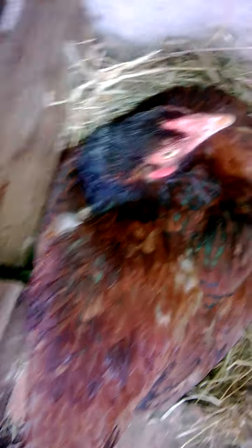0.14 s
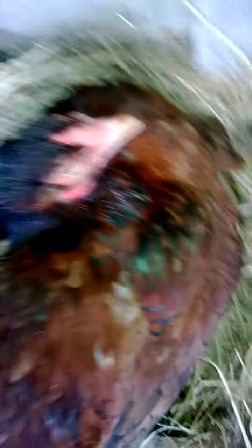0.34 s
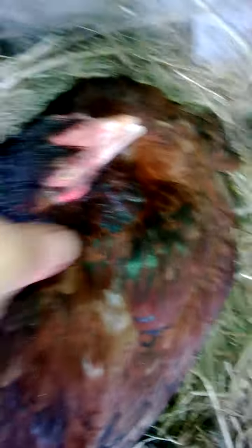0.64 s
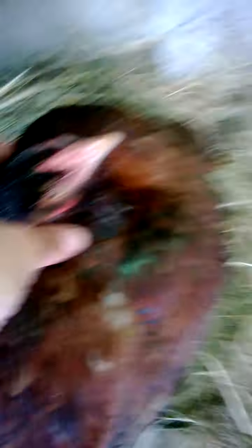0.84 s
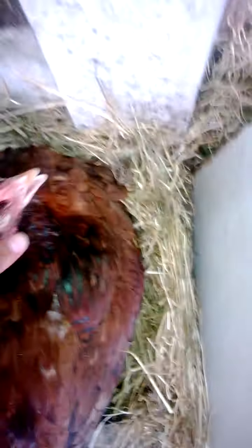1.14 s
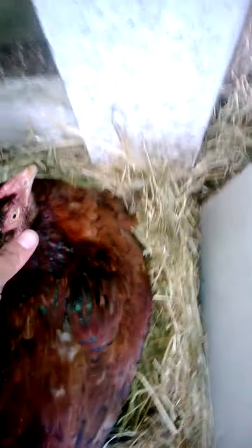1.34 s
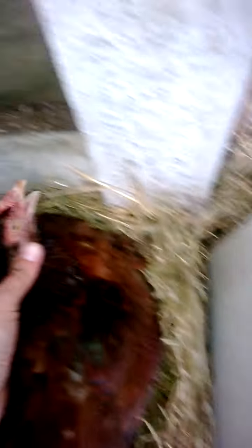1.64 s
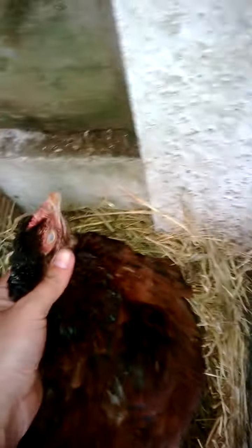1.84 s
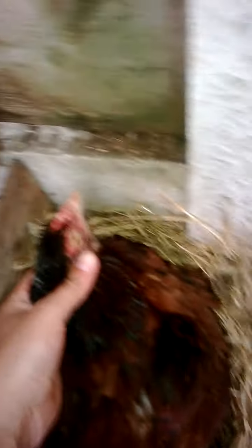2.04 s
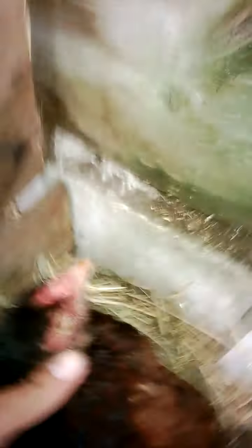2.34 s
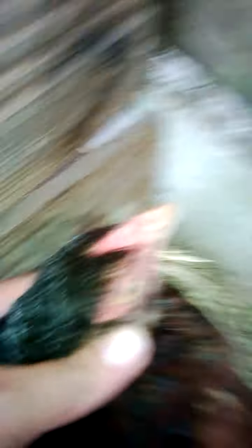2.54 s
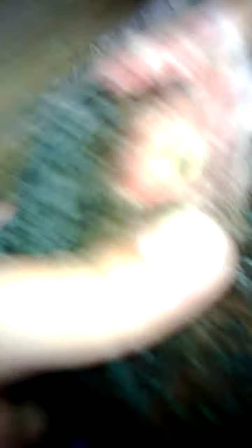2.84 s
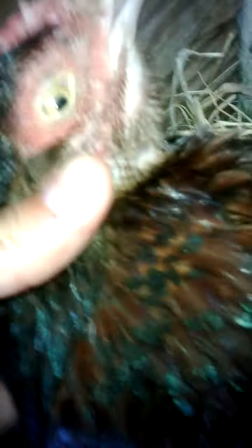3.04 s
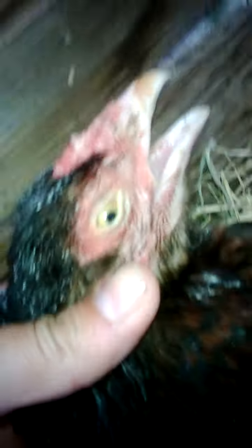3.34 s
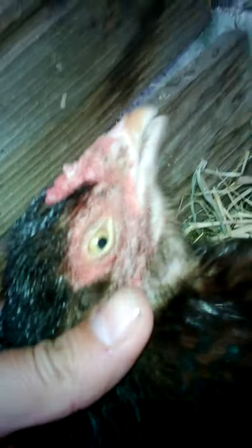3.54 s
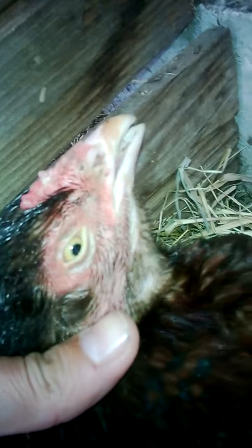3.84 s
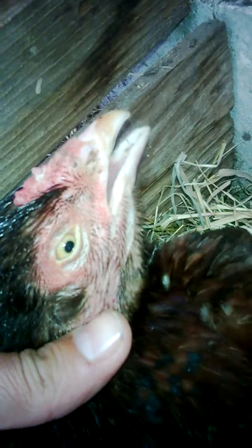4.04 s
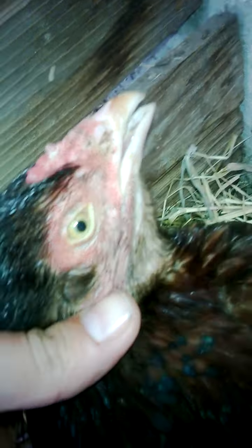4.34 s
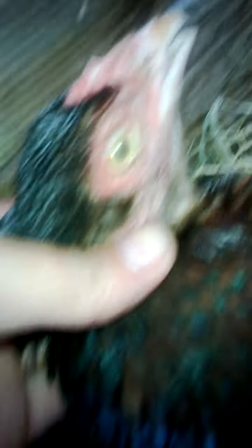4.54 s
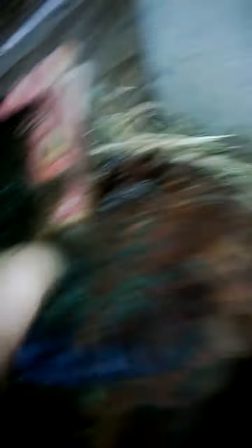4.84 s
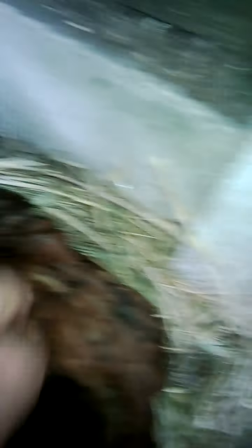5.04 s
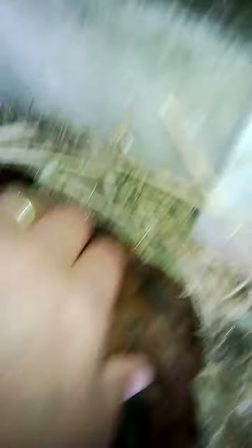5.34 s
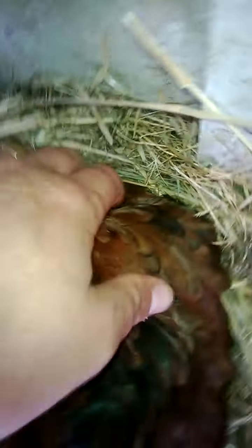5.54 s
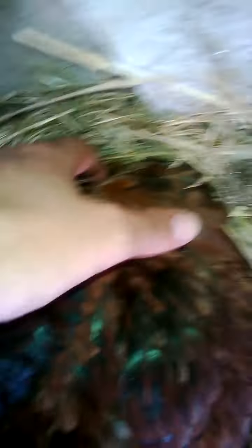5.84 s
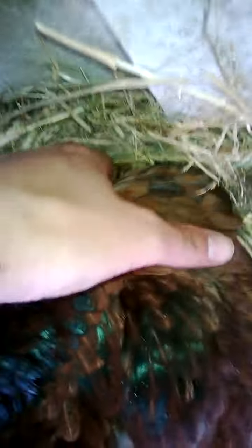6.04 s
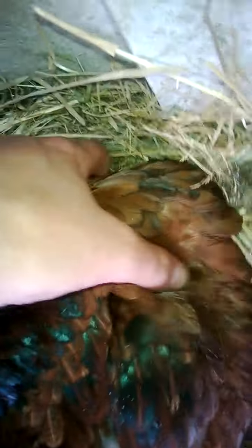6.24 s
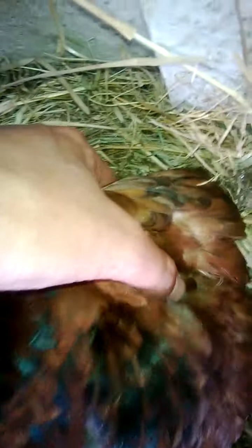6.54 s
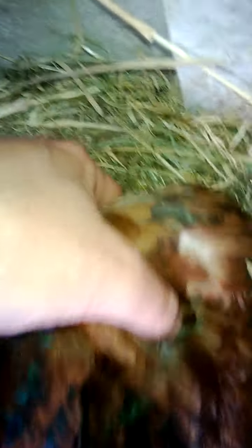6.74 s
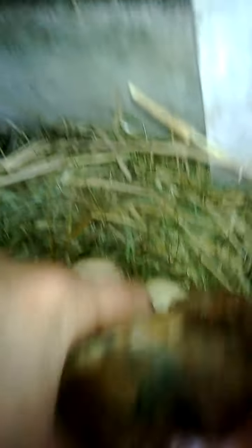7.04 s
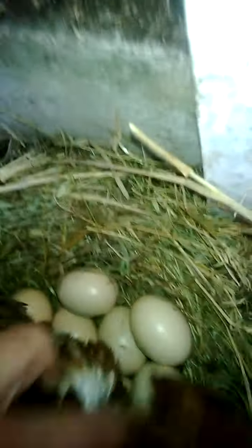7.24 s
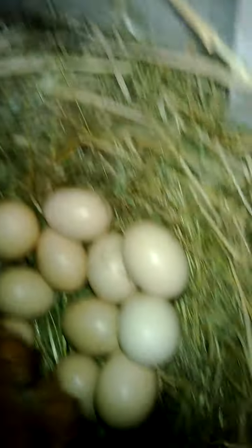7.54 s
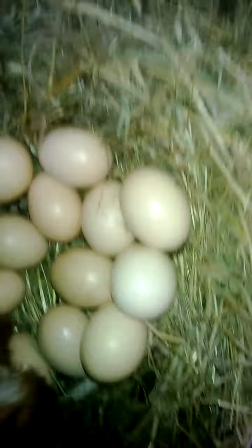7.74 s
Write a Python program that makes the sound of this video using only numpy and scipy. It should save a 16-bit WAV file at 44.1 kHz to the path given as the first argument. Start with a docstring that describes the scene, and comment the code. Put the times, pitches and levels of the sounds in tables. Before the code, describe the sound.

Close, dry mono sound inside a small straw-lined nest box, with faint steady yard hiss and a low engine throb outside that revs and sags. From 0.3 to 2 seconds a hen gives faint peeps and short squawks at about 0.65, 1.2 and 1.7, with soft clucks, as a hand lightly rustles feathers. Around 2.1 to 2.6 the rubbing grows firmer, ending in a scrape. At 2.85 and 3.45 come rough squawks, the latter a quick stutter; hoarse grumbles and tiny nasal whines follow until 4.8, while the engine swells near 3.2 and dips near 4.2. From 5.05 to 6.9 clear peeps alternate regularly with low clucks, about three pairs a second, over brushing and scrapes at 5.4 and 6.0. A peep at 7.05, squawk at 7.3, peep and dry ticks around 7.55, then a sharp snap and thin squawk at 7.8 as the engine revs.

```python
"""Sharp squawks, thin peeps and low gruff clucks of a broody hen, stroked and lifted off her eggs in a nest
box. Her calls are syrinx pulses rung through throat, windpipe and beak, whistles and whines, answered by the
box. A hand slides over her feathers, stroke by stroke: shaped noise with crackles, swishes and scrapes; dry
ticks of straw and beak, and a faint whine trails after one grumble. Outside an engine revs, idles and revs
again: low exhaust orders and rumble. The yard is a steady faint hiss."""
import sys
import numpy as np
from scipy import signal
from scipy.fft import rfft, irfft, next_fast_len
from scipy.io import wavfile
from scipy.ndimage import uniform_filter1d, minimum_filter1d, map_coordinates

SR = 44100
rng = np.random.default_rng(int(sys.argv[2]) if len(sys.argv) > 2 else 0)


def dump(signal):
    """Clip the signal to [-1, 1] and save it as 16-bit WAV at the path in sys.argv[1]."""
    limited = np.clip(np.atleast_2d(signal).T, -1, 1)
    pcm = np.round(limited * 32767).astype(np.int16)
    wavfile.write(sys.argv[1], SR, pcm)


N = 347508
TOP_HZ = 15800  # band limit of the voice pulses and of the output

# low throat resonances: (centre [Hz], width [Hz], level [dB])
CHEST = [(240, 400, -5), (618, 178, 3), (1140, 220, -2.5)]
# high windpipe resonances: (centre [Hz], width [Hz], relative level [dB])
WINDPIPE = [(3310, 3800, -7), (6115, 370, -5), (6660, 330, -5.5), (8130, 6700, -20.5)]


def amp(db):
    """Decibels to gain."""
    return 10 ** (np.asarray(db) / 20)


def unit(x):
    """Scale to rms 1."""
    return x / np.sqrt(np.mean(x ** 2) + 1e-20)


def along(points, hz):
    """(Hz, value) points read on a log-frequency axis."""
    f, v = np.transpose(points)
    return np.interp(np.log(hz + 1), np.log(f + 1), v)


def curves(rows):
    """One value per sample for each column after the time."""
    s, *cols = np.transpose(rows)
    return [np.interp(np.arange(N) / SR, s, c) for c in cols]


def wobble(rate, size=N):
    """A smooth random curve, rate knots a second."""
    return map_coordinates(rng.standard_normal(4096), [np.arange(size) * rate / SR], mode="wrap")


def filtered(x, response):
    """x through a complex response of frequency."""
    m = next_fast_len(len(x) + 4096)
    return irfft(rfft(x, m) * response(np.fft.rfftfreq(m, 1 / SR)), m)[:len(x)]


def resonances(modes, f):
    """Causal response of (Hz, width Hz, dB) resonances of alternating sign."""
    return sum((-1) ** k * amp(db) * 1j * f * w / (c * c - f * f + 1j * f * w)
               for k, (c, w, db) in enumerate(modes))


def chest_response(f):
    """Throat resonances with a steep rolloff above 1450 Hz."""
    return resonances(CHEST, f) / (1 + (f / 1450) ** 8)


def hiss(spectrum):
    """Coloured noise of rms 1 with faint time-frequency patches of random gain."""
    z = signal.stft(rng.standard_normal(N), nperseg=512)[2]
    field = uniform_filter1d(rng.standard_normal(z.shape), size=10, axis=0)
    field = uniform_filter1d(field, size=16, axis=1)
    noise = signal.istft(z * amp(2.5 * unit(field)), nperseg=512)[1][:N]
    return unit(filtered(noise, lambda hz: amp(along(spectrum, hz))))


def narrow_hiss(centre_hz, width_hz):
    """A narrow band of noise around a moving centre."""
    phase = 2 * np.pi * np.cumsum(centre_hz) / SR
    return wobble(width_hz, len(phase)) * np.cos(phase) + wobble(width_hz, len(phase)) * np.sin(phase)


def add(track, s, sound):
    """Mix a sound into the track at time s."""
    room_left = track[round(s * SR):][:len(sound)]
    room_left += sound[:len(room_left)]


def scatter(x, share=0.8, t60=0.016):
    """Hand and boards close by smear each pulse; the echo pattern is redrawn for each sound."""
    t = np.arange(512) / SR
    echoes = rng.standard_normal(len(t)) * amp(-60 * t / t60)
    return x + share * signal.fftconvolve(x, echoes / np.linalg.norm(echoes))[:len(x)]


def yard():
    """The quiet yard: steady coloured noise."""
    # (frequency [Hz], relative density [dB])
    yard_spectrum = [(160, 5.5), (300, -20.5), (1200, -16.5), (4000, -28.5), (7000, -32), (15000, -57.5)]
    return amp(-52.0) * hiss(yard_spectrum)


def engine(rumble_db=-12, steady_db=-29):
    """Exhaust firings from outside, lowest orders only; uneven when weak, steadier under load."""
    # (time [s], mean firing rate [1/s])
    revs = [(0.15, 34.1), (0.5, 55), (1.17, 51.5), (1.68, 60), (2.92, 58.5), (3.43, 71.0), (4.2, 36),
            (4.42, 61.5), (6.15, 61), (6.33, 71), (6.7, 29), (7.08, 53.0), (7.42, 43.9), (7.88, 64.6)]
    # (time [s], level [dB])
    throb_levels = [(0.15, -52.5), (0.26, -32), (1.3, -37.5), (1.66, -26.5), (2.52, -28.5), (2.63, -39.5),
                    (2.96, -35.5), (3.18, -21), (4.25, -48), (4.47, -35.5), (5.59, -36.5), (6.33, -31),
                    (6.56, -47), (6.8, -28), (7.42, -38.5), (7.62, -28.5), (7.88, -26)]
    # gain of the firing orders: (frequency [Hz], relative level [dB])
    exhaust = [(25, -22), (40, -5.5), (62, 3), (85, -5.5), (120, -11.5), (180, -16.5), (240, -34.5),
               (400, -46.5)]
    # (frequency [Hz], relative density [dB])
    rumble_spectrum = [(45, -9.5), (90, 2), (260, -16), (1500, -57.5)]
    rate, = curves(revs)
    db, = curves(throb_levels)
    uneven = np.minimum(amp((steady_db - db) / 2), 2)  # wobble depth in dB, also rumble gain
    phase = 2 * np.pi * np.cumsum(rate * (1 + 0.0084 * wobble(24))) / SR
    orders = np.arange(1, 8)[:, None]
    gains = amp(along(exhaust, orders * rate))
    partials = gains * np.sin(orders * phase + orders ** 2)
    throb = np.sqrt(2) * np.sum(partials, axis=0) / np.linalg.norm(gains, axis=0)
    return amp(db) * (throb * amp(uneven * wobble(22)) + uneven * amp(rumble_db) * hiss(rumble_spectrum))


def hollow_hiss(low_hz=1380, high_hz=1620, width_hz=450):
    """A faint narrow band of hiss that creeps up in pitch."""
    # (time [s], level [dB])
    hollow = [(1.2, -70), (1.3, -48.5), (1.55, -48.5), (1.85, -59.5), (2.08, -60.5), (2.2, -43),
              (2.55, -76)]
    db, = curves(hollow)
    centre_hz, = curves([(hollow[0][0], low_hz), (hollow[-1][0], high_hz)])
    return amp(db) * narrow_hiss(centre_hz, width_hz)


def ticks(t60=0.016, width_hz=890):
    """Dry snaps of straw and beak: decaying noise through one broad resonance."""
    # (time [s], level [dB], resonance [Hz])
    tick_rows = [(0.713, -33.5, 6760), (3.185, -30, 1490), (7.486, -42, 5570), (7.585, -24.5, 5400),
                 (7.599, -31, 5000), (7.822, -17, 2660)]
    track, t = np.zeros(N), np.arange(2048) / SR
    for s, db, hz in tick_rows:
        noise = rng.standard_normal(len(t))
        snap = unit(filtered(noise, lambda f: resonances([(hz, width_hz, 0)], f) ** 2))
        add(track, s, amp(db - 60 * t / t60) * snap)
    return track


def gliding_hiss(width_hz=680):
    """Narrow gliding bands of hiss that swell and fade: rubbed feather vanes sing, and one faint whine trails
    after a grumble."""
    # (time [s], length [s], level [dB], first centre [Hz], last centre [Hz])
    glides = [(2.298, 0.23, -36.5, 5290, 5740), (3.223, .06, -43, 2200, 2570),
              (3.234, .19, -54.5, 4800, 4930), (7.537, 0.19, -46, 5800, 5100)]
    track = np.zeros(N)
    for s, length, db, first_hz, last_hz in glides:
        u = np.linspace(0, 1, round(length * SR))
        band = narrow_hiss(first_hz + (last_hz - first_hz) * u, width_hz)
        add(track, s, amp(db) * np.sin(np.pi * u) * band)
    return track


def feathers(scrape_t60=0.065, longest_attack_s=0.09, release_s=0.091, brush_width_hz=2300,
             crackles_per_s=87, crackle_db=-15):
    """A hand slides over plumage: barbs catch and slip, straws snap; strokes that start firm start abruptly."""
    # firm rub: (frequency [Hz], relative density [dB])
    rub_spectrum = [(250, -9.5), (800, -17), (1600, -7), (2600, -1), (3300, -6), (4200, -13), (9000, -52.5)]
    # brushing: (frequency [Hz], relative density [dB])
    brush_spectrum = [(2500, -22), (3900, -7.5), (4900, -11), (5600, -13.5), (6400, -23), (12000, -51)]
    # silky hiss: (frequency [Hz], relative density [dB])
    silk_spectrum = [(4000, -35.5), (5900, 5), (8800, -8), (10500, -20.5), (12000, -35.5)]
    # strokes of the hand: (time [s], length before the fade [s], firm rub [dB], brush [dB],
    # silky hiss [dB], brush resonance [Hz], growth from start to end [dB])
    strokes = [(0.262, 0.45, -52, -57.5, -57, 4270, 3), (0.778, 0.23, -52.5, -52, -54, 4900, -13.5),
               (1.31, 0.33, -58, -57.5, -59.5, 4500, -2), (2.136, 0.41, -43, -45.5, -48, 5600, 5),
               (2.602, 0.079, -42.5, -53, -49, 5800, -2), (2.846, 0.3, -56, -58, -67, 4750, -15),
               (3.169, 1, -62.5, -68, -80, 4720, -17), (4.368, 0.32, -54, -53.5, -72, 4770, -2.5),
               (4.687, 0.32, -49, -47, -53, 4280, 5.5), (5.039, 0.75, -53, -55.5, -51.5, 5580, -0.5),
               (5.784, 0.17, -51, -52, -56, 5800, 16.5), (6.035, 0.63, -64.5, -71, -66, 5820, -13.5),
               (6.654, 0.38, -54, -68, -55, 6140, 6), (7.06, 0.4, -57.5, -61.5, -65, 6160, 7),
               (7.509, 0.3, -49.5, -53, -75.5, 6000, 0.5)]
    # straw and quills catch on the hand: (time [s], level [dB])
    scrapes = [(0.793, -37), (2.572, -25), (5.399, -30.5), (5.992, -36.5)]
    grain = amp(1.5 * wobble(30) + 1.3 * wobble(450))
    rub, brush, silk = hiss(rub_spectrum), hiss(brush_spectrum), hiss(silk_spectrum)

    def crackle_colour(hz):
        return amp(along(brush_spectrum, hz)) + amp(along(silk_spectrum, hz)) / 10

    snaps = (rng.random(N) < crackles_per_s / SR) * rng.standard_normal(N)
    crackle = unit(filtered(scatter(snaps), crackle_colour))
    sliding = np.zeros(N)
    for s, length, rub_db, brush_db, silk_db, brush_hz, growth_db in strokes:
        span = slice(round(s * SR), round((s + length + release_s) * SR))
        t = np.arange(len(rub[span])) / SR
        attack = longest_attack_s * amp(min(growth_db, 0) / 2)
        touch = np.clip(np.minimum(t / attack, 1 - (t - length) / release_s), 0, 1)
        swish = unit(filtered(brush[span], lambda f: resonances([(brush_hz, brush_width_hz, 0)], f) ** 2))
        colour = amp(rub_db) * (rub[span] + amp(crackle_db) * crackle[span])
        colour = colour + amp(brush_db) * swish + amp(silk_db) * silk[span]
        add(sliding, s, touch * amp(growth_db * (t / length - 0.5)) * colour)
    catches, t = np.zeros(N), np.arange(SR // 4) / SR
    for s, db in scrapes:
        add(catches, s, amp(db - 60 * t / scrape_t60) * (1 - np.exp(-t / 0.0038)))
    return grain * (sliding + catches * (rub + silk + brush) / 2)


def nest_box(x):
    """Close walls answer with a brief noise tail, the treble dying first; redrawn for each call."""
    # (frequency [Hz], t60 [s])
    box_t60 = [(200, 0.11), (1200, 0.082), (2500, 0.094), (6000, 0.084), (12000, 0.013)]
    hz, t, z = signal.stft(rng.standard_normal(SR // 8), SR, nperseg=256)
    decay = amp(-60 * t / along(box_t60, hz)[:, None])
    tail = signal.istft(z * decay, SR, nperseg=256)[1]
    return signal.fftconvolve(np.pad(x, (128, 0)), tail / np.linalg.norm(tail))


def throat_pop(t60=0.02):
    """A tiny puff of noise that rings the low throat resonances."""
    t = np.arange(2048) / SR
    puff = unit(filtered(rng.standard_normal(len(t)), chest_response))
    return amp(-60 * t / t60) * (1 - np.exp(-t / 0.0015)) * puff


def whine(row, waver=0.022, rasp=0.37, attack=0.11):
    """Nasal whine: pulses and breath through resonances, the second harmonic sliding into the beak's."""
    # open-beak resonances: (centre [Hz], width [Hz], relative level [dB])
    nasal = [(1170, 210, 1.5), (2015, 360, 7), (3850, 280, -27)]
    _, length, db, first_hz, last_hz, doubling = row
    size = 4096
    u = np.clip(np.arange(size) / SR / length, 0, 1)
    pitch = first_hz + (last_hz - first_hz) * np.sin(np.pi / 2 * u)
    pitch = pitch * (1 + waver * wobble(310, size))
    phase = 2 * np.pi * np.cumsum(pitch) / SR
    pulses = unit(np.sum(np.cos(np.arange(1, 7)[:, None] * phase), axis=0))
    pulses = pulses * (1 + doubling * np.cos(phase / 2))
    effort = np.clip(u / attack, 0, 1) * np.clip(2 * (1 - u), 0, 1)
    source = effort * (pulses + rasp * rng.standard_normal(size))
    tone = filtered(source, lambda f: resonances(nasal, f) / (1 + (f / 4300) ** 6))
    return amp(db) * np.sqrt(np.mean(effort ** 2)) * unit(tone)


def peep(row, waver=0.0086, third_db=-12, fall_db=-11, hoarse=0.37, scoop=0.3):
    """A nearly pure arched whistle; hoarse overtones come out with a wider beak."""
    _, length, db, first_hz, middle_hz, last_hz, overtone_db = row
    size = 4096
    u = np.clip(np.arange(size) / SR / length, 0, 1)
    arch = np.polyfit([0, 0.5, 1], [first_hz, middle_hz, last_hz], 2)
    pitch = np.polyval(arch, u) * (1 + waver * wobble(266, size))
    pitch = pitch * (1 - scoop * (2 * u - 1) ** 10)  # scoops up at the start, sags at the end
    phase = 2 * np.pi * np.cumsum(pitch) / SR
    shaky = phase + hoarse / 2 * wobble(1500, size)
    overtones = np.sin(2 * shaky)
    for k in range(3):
        overtones = overtones + amp(third_db + fall_db * k) * np.sin((k + 3) * shaky)
    swell = np.abs(np.sin(np.pi * u ** 0.89)) ** 1.52 * amp(wobble(97, size))
    return np.sqrt(2) * amp(db) * swell * (np.sin(phase) + amp(overtone_db) * overtones)


def cluck(row, jitter, flutter_db, doubling, rasp, shoulder, knee, bright_hz, windpipe=WINDPIPE):
    """A puff through the syrinx: pulses start clean, surge and break into a rasp, rung by throat and beak."""
    # mouth colour: (frequency [Hz], relative level [dB])
    beak_band = [(200, -42.5), (900, -8), (1600, 11.5), (3900, 4), (4600, -1.5), (5300, 5), (6800, -2.5),
                 (9000, -7.5), (15000, -20)]
    # beak resonance at start, crest and end: (share of its nominal frequency)
    beak_path = [0.99, 0.97, 0.86]
    pitch_hold = 2.6  # larger: pitch holds longer before it breaks
    _, length, swell, chest_db, beak_db, first_hz, last_hz, rough, beak_hz, beak_width_hz = row
    size = 4096
    u = np.clip(np.arange(size) / SR / length, 0, 1)
    crest = np.clip(swell / length, 0.1, 0.85)
    surge = crest * knee
    effort = np.interp(u, [0, crest / 4, surge, crest, (1 + crest) / 2, 1], [0, shoulder, 0.6, 1, 0.72, 0])
    ragged = rough ** np.interp(u, [surge, crest], [2, 1]) * (1 + u / 2)
    pitch = first_hz + (last_hz - first_hz) * u ** pitch_hold
    pitch = pitch * np.exp(jitter * ragged * wobble(344.1, size))
    phase = 2 * np.pi * np.cumsum(pitch) / SR
    k = np.arange(1, 41)[:, None]
    pulses = unit(np.sum(np.cos(k * phase) * (k * pitch < TOP_HZ), axis=0))
    # strong and weak pulses alternate, and air rasps through at each opening
    pulses = pulses * (1 + doubling * ragged * np.cos(phase / 2)) * amp(flutter_db * ragged * wobble(600, size))
    air = ragged * (1 + np.cos(phase)) * rng.standard_normal(size)
    source = effort * (pulses + rasp * air) / np.sqrt(1 + (rasp * ragged) ** 2)
    chest = filtered(effort * (pulses + air / 2), chest_response)

    def mouth(f):
        return amp(along(beak_band, f)) / (1 + (f / bright_hz) ** 4)

    # crossfaded stages move the beak resonance
    beak = np.zeros(size)
    for stage, share in zip(np.eye(len(beak_path)), beak_path):
        def opening(f):
            ring = resonances([(beak_hz * share, beak_width_hz, 0)], f)
            return ring * mouth(f) / (1 + (f / (2 * beak_hz)) ** 4)
        beak = beak + filtered(source * np.interp(u, [0, crest, 1], stage), opening)
    # extra effort factor: the windpipe speaks mostly at full effort
    beak = beak - filtered(source * effort, lambda f: resonances(windpipe, f) * mouth(f))
    voiced = amp(chest_db) * unit(chest) + amp(beak_db) * unit(scatter(beak))
    return np.sqrt(np.mean(effort ** 2)) * voiced


def hen(crest=0.69, shut_beak_hz=1800, shut_width_hz=600, box_db=-13.0):
    """All her calls, each answered by the box; a rising grunt leads into every peep."""
    # (time [s], length [s], time to crest [s], chest [dB], beak [dB], first pitch [Hz], last pitch [Hz],
    # roughness [0-1], beak resonance [Hz], its width [Hz], windpipe [dB], high ring [Hz], high ring [dB])
    squawks = [(0.649, 0.035, 0.019, -19, -9.5, 979, 735, 0.2, 2116, 700, -1.5, 5850, -22.5),
               (1.204, .038, 0.018, -18, -11.5, 1133, 1024, 0.55, 2330, 860, -2.5, 6860, -19.5),
               (1.725, 0.029, 0.037, -18.5, -12.5, 1065, 493, .65, 2910, 1180, -6.5, 4510, 6.5),
               (2.856, 0.038, 0.016, -21, -9, 1098, 603, 1, 2900, 1093, -9, 3640, -1.5),
               (3.449, 0.0082, 0.0067, -24, -17.5, 1130, 1110, 0.68, 2810, 500, -6, 4910, -20.5),
               (3.461, 0.029, 0.0046, -20, -9, 1114, 1045, 0.71, 2820, 454, -9.5, 6180, -10),
               (3.478, 0.026, 0.032, -19.5, -11.5, 428, 299, 0.9, 2080, 500, -1, 5660, -5.5),
               (4.167, .032, 0.019, -18.5, -11.5, 566, 263.4, 0.86, 1840, 700, -1, 5570, -15),
               (4.834, 0.037, 0.018, -14.5, -13.5, 620, 550, 0.86, 1800, 850, -1, 5450, 7.5),
               (7.274, 0.031, 0.0216, -14, -14.5, 696, 507, .7, 1870, 1100, 0.5, 4200, -1),
               (7.831, 0.036, 0.0076, -29.5, -6.5, 1286, 1285, 0.81, 2640, 496, -5, 6520, -3.5)]
    # half-voiced squawks, a clean low tone under a breathy rasp:
    # (time [s], chest [dB], beak [dB], first pitch [Hz])
    grumbles = [(1.984, -22.5, -36, 599), (3.187, -23, -26, 571.5), (3.865, -25, -26, 564.5),
                (4.617, -24.5, -24, 537.5)]
    # gruff, beak nearly shut: (time [s], length [s], chest [dB], beak [dB], first pitch [Hz])
    clucks = [(0.717, 0.016, -25.5, -49, 400), (1.257, 0.021, -16, -20.5, 496),
              (2.03, 0.034, -29, -40.5, 443), (2.097, 0.012, -35, -54, 624), (5.106, 0.029, -18, -49, 335),
              (5.38, 0.032, -19, -54, 338.8), (5.669, .016, -20.5, -38, 345.6),
              (5.971, 0.0202, -20.5, -62, 340), (6.272, 0.026, -21.5, -42, 308.7),
              (6.574, 0.015, -26.5, -51, 344), (6.859, 0.0093, -21.5, -37, 383)]
    # (time [s], length [s], level [dB], middle pitch [Hz], glide [Hz], overtones [dB], opening grunt [dB])
    peeps = [(0.286, 0.085, -42, 1088, 42, -4, -31), (0.912, 0.038, -36.5, 1395, 201, -3, -30.5),
             (1.496, 0.046, -35.5, 1354, 217, -34, -30), (2.341, 0.032, -23.5, 1216, 0, -21, -24),
             (2.607, 0.058, -40, 1137, 262, 3.5, -42.5), (5.066, 0.031, -14.5, 1131, -20, -32, -25.5),
             (5.32, 0.059, -17, 1149, -83, -33, -27.5), (5.604, 0.045, -20.5, 1080, -22, -53, -36),
             (5.898, 0.042, -17.5, 1151, 27, -35, -39), (6.182, 0.034, -20.5, 1157, 142, -34, -42.5),
             (6.49, 0.047, -24.5, 1077, 38, -27, -45), (6.773, 0.043, -28, 1176, 192, -17, -44),
             (7.046, 0.053, -26, 1225, -46, -13, -24), (7.529, 0.059, -23.5, 1226, -76, -8, -49)]
    # the wider the beak, the deeper both ends of a peep droop: (overtones [dB], droop [share of pitch])
    droop = [(-23.5, 0.05), (-8.5, 0.175)]
    # through the open beak: (time [s], length [s], level [dB], first pitch [Hz], last pitch [Hz],
    # period doubling [0-1])
    whines = [(3.935, 0.031, -25, 884, 1136, 0.04), (3.97, 0.04, -31, 1058, 1065, 0.4),
              (4.678, 0.038, -37, 870, 1255, 0.5)]
    # the throat pops open before some peeps: (time [s], level [dB])
    pops = [(1.472, -30), (5.571, -33.5), (5.874, -29), (6.467, -28), (7.517, -29)]
    ring_width_hz = 150  # the ring's pitch shifts between squawks as her neck stretches
    grumble_s, grumble_rise, grumble_rough = 0.0314, 1.3, 0.65  # rise: last pitch over first
    slack_hz, cluck_rough = 281.7, 0.54  # every cluck ends at the pitch of the slack syrinx
    grunt_lead_s, grunt_s, grunt_rough = 0.011, 0.01885, 0.56
    grunt_from, grunt_to = 0.46, 0.744  # shares of the peep's pitch
    grunt_beak_db = -18.5  # over its chest level
    calls = []
    for *row, windpipe_db, ring_hz, ring_db in squawks:
        windpipe = [(hz, width, db + windpipe_db) for hz, width, db in WINDPIPE]
        windpipe.append((ring_hz, ring_width_hz, ring_db))
        calls.append((row[0], cluck(row, jitter=0.11, flutter_db=3, doubling=0.51, rasp=1, shoulder=0.48,
                                    knee=0.66, bright_hz=11400, windpipe=windpipe)))
    for s, chest_db, beak_db, hz in grumbles:
        row = (s, grumble_s, crest * grumble_s, chest_db, beak_db, hz, hz * grumble_rise, grumble_rough,
               shut_beak_hz, shut_width_hz)
        calls.append((s, cluck(row, jitter=0.029, flutter_db=2, doubling=0.23, rasp=4.4, shoulder=0.26,
                               knee=0.67, bright_hz=3450)))
    soft = [(*row, slack_hz, cluck_rough) for row in clucks]
    for s, length, db, hz, glide_hz, overtone_db, grunt_db in peeps:
        ends_hz = hz * (1 - np.interp(overtone_db, *np.transpose(droop)))
        soft.append((s - grunt_lead_s, grunt_s, grunt_db, grunt_db + grunt_beak_db,
                     hz * grunt_from, hz * grunt_to, grunt_rough))
        row = (s, length, db, ends_hz - glide_hz / 2, hz, ends_hz + glide_hz / 2, overtone_db)
        calls.append((s, peep(row)))
    for s, length, *tone in soft:
        row = (s, length, crest * length, *tone, shut_beak_hz, shut_width_hz)
        calls.append((s, cluck(row, jitter=0.16, flutter_db=3.5, doubling=0.14, rasp=0.6, shoulder=0.26,
                               knee=0.54, bright_hz=2300)))
    calls += [(row[0], whine(row)) for row in whines]
    calls += [(s, amp(db) * throat_pop()) for s, db in pops]
    voice = np.zeros(N)
    for s, sound in calls:
        add(voice, s, sound)
        add(voice, s, amp(box_db) * nest_box(sound))
    return voice


def scene():
    """Yard, engine, hand, straw and the hen in her box, in one channel."""
    small_sounds = hollow_hiss() + ticks() + gliding_hiss() + feathers()
    return (yard() + engine() + small_sounds + hen())[None]


def record(dry, ceiling=0.78, lookahead_s=0.0013):
    """A fast look-ahead limiter holds peaks to the ceiling, then a sharp low-pass cuts at TOP_HZ."""
    window = 2 * round(lookahead_s * SR) + 1
    needed = np.minimum(1, ceiling / (np.abs(dry[0]) + 1e-9))
    gain = uniform_filter1d(minimum_filter1d(needed, window), window)
    return filtered(gain * dry[0], lambda hz: hz < TOP_HZ)[None]


dry = scene()
out = record(dry)
dump(out)
```